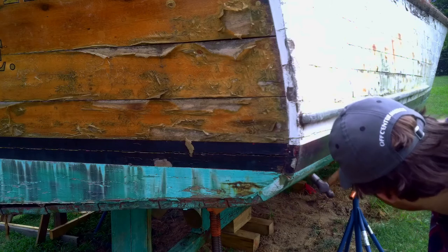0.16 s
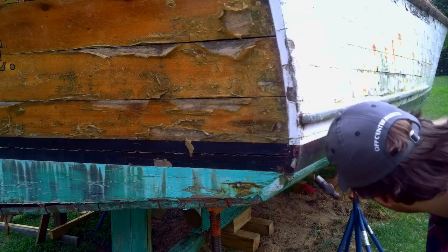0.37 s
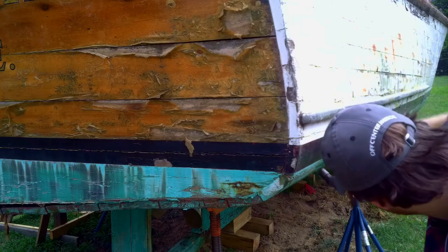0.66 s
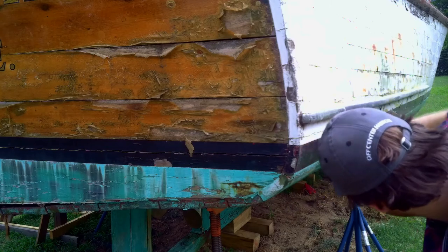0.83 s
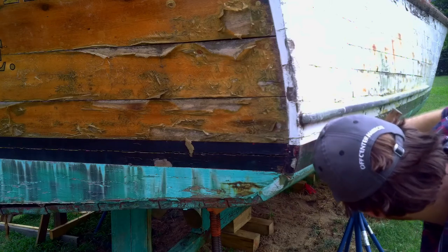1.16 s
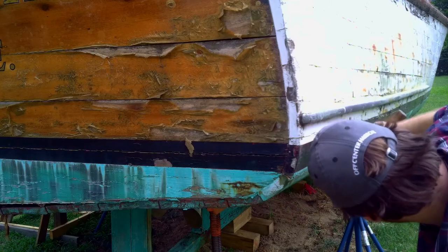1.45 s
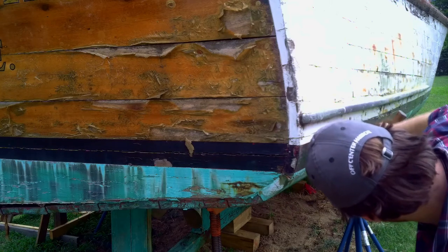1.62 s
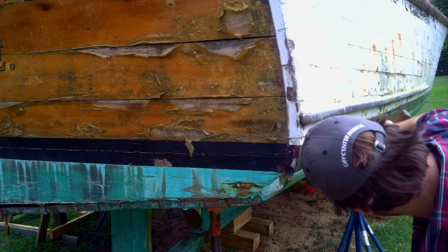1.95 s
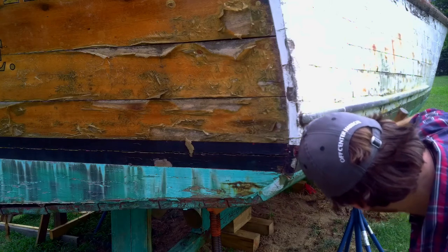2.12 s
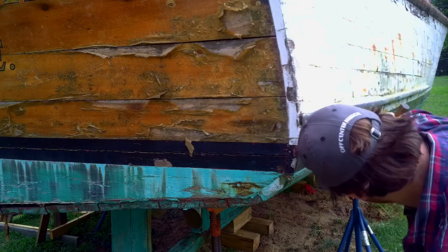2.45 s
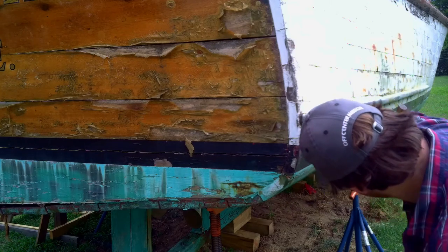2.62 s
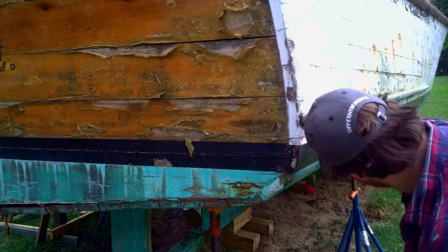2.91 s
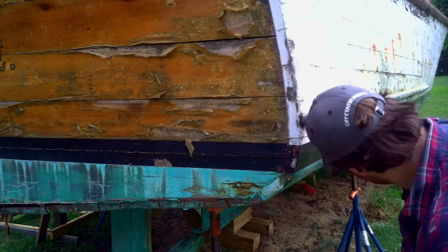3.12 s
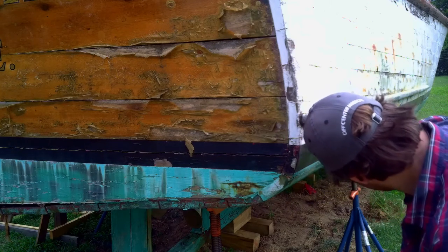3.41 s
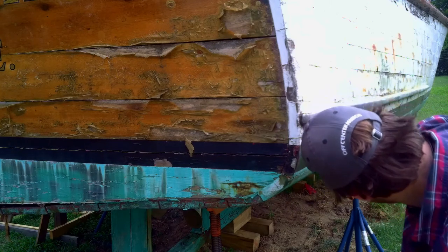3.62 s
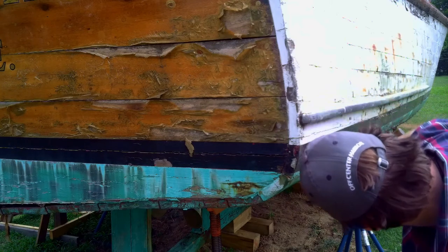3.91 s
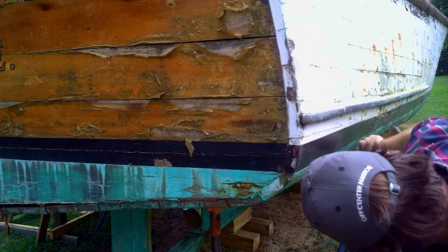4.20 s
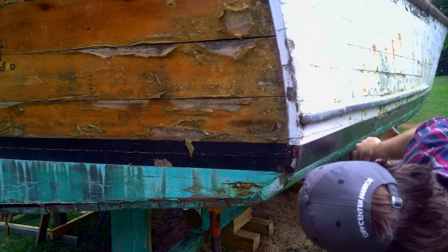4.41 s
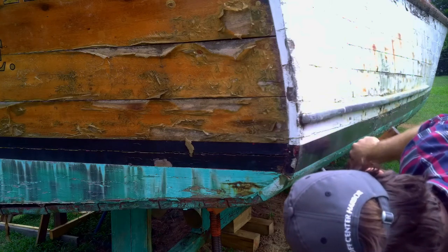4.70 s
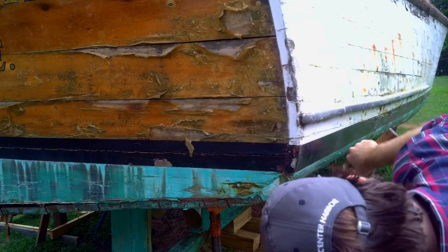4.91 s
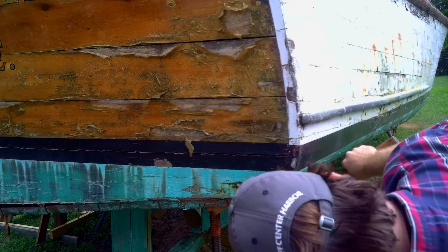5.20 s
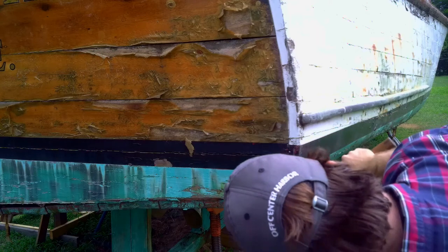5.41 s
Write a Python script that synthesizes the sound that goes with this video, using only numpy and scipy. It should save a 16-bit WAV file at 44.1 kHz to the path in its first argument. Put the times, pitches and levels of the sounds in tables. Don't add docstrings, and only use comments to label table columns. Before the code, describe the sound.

Outdoors beneath a propped wooden boat, a small hammer taps its planks about four times a second. Each dry, hollow knock has a short ring and small crack, with quick echoes from ground and props. The pitch shifts between planks, dropping boomier midway, softening later, then ending firm but duller. Faint high insects throb behind, with distant whistles and low traffic. One close microphone, heard in the left channel only.

```python
import sys
import numpy as np
from scipy import signal
from scipy.fft import rfft
from scipy.io import wavfile
from scipy.ndimage import uniform_filter1d

SR = 44100
rng = np.random.default_rng(int(sys.argv[2]) if len(sys.argv) > 2 else 0)


def makeup_ratio(level_db):
    decades = np.asarray(level_db, float) / 20
    return 10 ** decades


def persist_wave(psi):
    counts = np.round(np.clip(psi, -1, 1) * 32767).astype(np.int16)
    wavfile.write(sys.argv[1], SR, np.atleast_2d(counts).T)


N = 245284

# f/Hz, level/dB per Hz
AIR_SPECTRUM = [(12, -58), (20, -14.5), (48, -14), (102, -8.5), (224, -2), (289, -8), (583, -15.5),
                (1080, -21.5), (1690, -29), (4050, -31.5), (6710, -35.5), (7950, -41), (9150, -37.5),
                (15200, -38), (16500, -59)]
# t/s, knock level/dB, boom f/Hz, edge mode level/dB, crack level/dB
TAPS = [(0.0912, -5.5, 268.0, -7, -27), (0.3574, -6, 271, -12.5, -36.5), (0.6085, -9.0, 270, -17.5, -37.5),
        (0.86, -10, 280, -19, -32), (1.1125, -11.5, 271, -25, -32.5), (1.3658, -9.5, 260.6, -24.5, -33),
        (1.6003, -8.9, 245, -16.7, -33), (1.8542, -11.5, 239.6, -20.5, -33.5), (2.1159, -8, 248, -11, -31),
        (2.377, -8, 249.8, -14, -30), (2.6242, -11.4, 257, -12, -33), (2.9168, -14, 255, -14.5, -35),
        (3.1527, -7.7, 256, -11, -26), (3.41, -8.0, 254.5, -3.1, -28), (3.6755, -10, 246, -5, -28.5),
        (3.9281, -15.5, 239.4, -10.5, -35.5), (4.168, -16, 235.1, -10.7, -34),
        (4.3755, -15.5, 243, -18, -32), (4.629, -17.5, 255, -36, -41), (4.8805, -14, 281, -23, -36.5),
        (5.1164, -7.5, 263, -8, -29.5), (5.3583, -7.5, 259, -4.5, -26.5)]
# t/s, level below its tap/dB
LATE_ECHOES = [(0.143, -17), (0.398, -10.5), (.648, -10), (1.647, -15), (1.896, -10), (2.665, -25),
               (2.959, -21.5), (3.19, -21.5), (3.447, -24), (3.712, -21), (5.385, -23)]
# from t/s, knock f/Hz, ring f/Hz, edge f/Hz, ground echo delay/ms
PLANKS = [
    (0, 469, 690, 860.0, 5.51),
    (0.75, 510, 712, 1057.0, 5.5),
    (1.25, 486, 630, 964.0, 5.3),
    (2, 489, 660, 952.0, 5.02),
    (2.5, 371, 535, 854, 4.94),
    (3.05, 420, 575, 906, 4.0),
    (3.8, 428, 600, 915, 4.0),
    (4.28, 488, 683, 959.0, 5.2),
    (5, 428.0, 574.0, 795, 5.6),
]
# boom and ring level re knock/dB, ground echo/dB, frame echo/dB, frame delay/ms
PLANK_ANSWERS = [(-5, -7, -2.5, -10, 13.1), (0.3, -3, -0.4, -2, 10.23), (-0.6, -8, -3, -8.8, 12.9),
                 (0.9, -6.0, -6, -12, 13.9), (5.5, 1.1, -1.5, -8, 14.5), (2.5, 1.3, -9, -12, 13.9),
                 (1.4, -0.7, -4, -9, 11.2), (1.1, -3, -3.5, -3.5, 10.0), (-7.5, -16, -0.8, -13, 16.4)]
FASTENINGS_DB = [-15.5, -15.5, -16.5, -18, -9, -17.5, -13, -15.5, -12.5]
# f/Hz, width/Hz, level/dB
CRACK_MODES = [(1060, 160, 7.5), (1560, 482, 4), (2120, 830, -2), (3480, 910, -5.5), (4660, 1950, -13.5)]
# f/Hz, t60/s
HULL_DECAY = [(120, 0.27), (320, 0.25), (840, 0.15), (2200, 0.23), (5800, 0.038)]
# delay/ms, dull knock level/dB, crack level/dB
FAR_RETURNS = [(12.206, -8.5, -13), (22.85, -9.5, -25), (42.07, -18, -30), (59.0, -21, -38),
               (103.0, -27, -42)]
# t/s, level/dB
FLAKES = [
    (0.674, -51.5),
    (1.298, -66.5),
]
# t/s, level/dB
CHIPS = [
    (.443, -60),
    (2.504, -63),
    (4.612, -67),
]
# t/s, length/s, first f/Hz, last f/Hz, level/dB
WHISTLES = [
    (0.557, 0.27, 3536, 3051, -64),
    (1.309, .24, 3566, 3190, -65),
    (1.53, 0.28, 3560, 3180, -70),
    (2.749, .28, 3360, 3050, -64.5),
    (4.47, .25, 3367, 3067, -65),
]
# delay/s, level/dB
TREE_ECHOES = [(.016, -7.5), (.06, -13), (.1, -12), (.14, -12), (.19, -14)]

AIR_DB = -57
CHORUS_DB, UNEVEN_DB = -73, 0.8
THROB_HZ, THROB_PEAK_S, THROB_DB, THROB_LEAN = 3.98, 0.17, 2.5, 0.18
SIGNS, T60_S = (1, -1, -1, 1), (0.067, 0.033, 0.022, 0.019)
CONTACT_HZ, RADIATION_HZ = 1120, 151.7
CRACK_T60_S, CRACK_DB = 0.017, 10.5
SLAP_MS, SLAP_SPREAD_MS, SLAP_DB = 5.4, 0.4, 1.2
TAIL_DB, FAR_SIDE_HZ = -11, 416
WHISTLE_BEND, WHISTLE_SWELL_DB, WHISTLE_EDGE_S = 1.3, 3, 0.0085
CHIP_S, CHIP_LOW_HZ, CHIP_TOP_HZ, CHIP_RISE_S = 0.017, 5900, 7550, 0.0032
CONVERTER_HZ, MIRROR_DB, CUTOFF_HZ = 16000, -6, 16050
BLOCK, BLOCK_START, BLOCK_LEAD = 1024, 930, 400


def rms_one(x):
    return x / np.sqrt(np.mean(x ** 2) + 1e-20)


def at_hz(points, hz):
    points_hz, values = np.array(points)[:, 0], np.array(points)[:, 1]
    return np.interp(np.log(hz), np.log(points_hz), values)


def drift(rate_hz):
    r = np.exp(-80 * np.pi * rate_hz / SR)
    white = rng.standard_normal(N // 40 + 2002)
    slow = signal.lfilter([1], [1, -2 * r, r * r], white)[2000:]
    return np.interp(np.arange(N) / 40, np.arange(len(slow)), rms_one(slow))


def band(x, low_hz, high_hz):
    return signal.sosfilt(signal.butter(2, [low_hz, high_hz], "band", fs=SR, output="sos"), x)


def one_pole(x, hz):
    r = np.exp(-2 * np.pi * hz / SR)
    return signal.lfilter([1 - r], [1, -r], x)


def resonate(x, hz, width_hz):
    r = np.exp(-np.pi * width_hz / SR)
    zeros = np.array([1, 0, -1]) * (1 - r * r) / 2
    poles = [1, -2 * r * np.cos(2 * np.pi * hz / SR), r * r]
    return signal.lfilter(zeros, poles, x)


def add(track, sound, s):
    at = round(s * SR)
    track[at:at + len(sound)] += sound[:len(track) - at]


def air(patchy_db):
    edges_hz = 16 * 2 ** np.arange(0, 10.1, .5)
    white, together = rng.standard_normal((2, N)), drift(1.5)
    out = 0
    for k, (low, high) in enumerate(zip(edges_hz, edges_hz[1:])):
        flicker_db = patchy_db * (1.5 * together + drift(9.3))
        gain = makeup_ratio(at_hz(AIR_SPECTRUM, np.sqrt(low * high)) + flicker_db)
        out = out + gain * band(white[k % 2], low, high)
    return makeup_ratio(AIR_DB + 7) * rms_one(out)


def insects(hz, width_hz, pulse_hz, depth):
    turn = 2 * np.pi * THROB_HZ * (np.arange(N) / SR - THROB_PEAK_S)
    throb_db = THROB_DB * (np.cos(turn) - THROB_LEAN * np.sin(2 * turn))
    db = CHORUS_DB + throb_db + UNEVEN_DB * drift(11.0)
    stroke_hz = pulse_hz * (1 + 0.018 * drift(3.7))
    strokes = 1 + depth * np.sin(2 * np.pi * np.cumsum(stroke_hz) / SR)
    rasp = resonate(rng.standard_normal(N), hz, width_hz)
    rasp = resonate(rasp, hz, width_hz)
    return makeup_ratio(db + 5.5) * rms_one(rasp * strokes)


def mode(age, hz, db, t60_s):
    return makeup_ratio(db - 60 * age / t60_s) * np.sin(2 * np.pi * hz * age)


def plank(modes_hz, modes_db, ground_ms, ground_db, frame_ms, frame_db, shoulder_db):
    age = np.arange(SR // 8) / SR
    direct = sum(sign * mode(age, hz, db, t60_s)
                 for sign, hz, db, t60_s in zip(SIGNS, modes_hz, modes_db, T60_S))
    direct = direct + mode(age, 174.7, modes_db[1] - 24, 0.09)
    direct = direct - mode(age, 1146, max(modes_db) + shoulder_db, 0.015)
    direct = one_pole(one_pole(direct, CONTACT_HZ), CONTACT_HZ)
    for _ in range(2):
        direct = direct - one_pole(direct, RADIATION_HZ)
    heard = direct.copy()
    add(heard, makeup_ratio(ground_db) * direct, ground_ms / 1000)
    add(heard, makeup_ratio(frame_db) * direct, frame_ms / 1000)
    return heard


def crack(noise, db):
    burst = noise * makeup_ratio(db + CRACK_DB - 60 * np.arange(len(noise)) / SR / CRACK_T60_S)
    return sum((-1) ** k * makeup_ratio(level_db) * resonate(burst, hz, width_hz)
               for k, (hz, width_hz, level_db) in enumerate(CRACK_MODES))


def under_hull():
    age = np.arange(SR // 2) / SR
    edges_hz = 90 * 2 ** np.arange(0, 6.6, .5)
    white = rng.standard_normal((2, len(age)))
    dying = 0
    for k, (low, high) in enumerate(zip(edges_hz, edges_hz[1:])):
        t60_s = at_hz(HULL_DECAY, np.sqrt(low * high))
        dying = dying + band(white[k % 2], low, high) * makeup_ratio(-60 * age / t60_s)
    dying = dying * np.clip((age - .005) / 0.013, 0, 1)
    return dying / np.sqrt(np.mean(np.abs(rfft(dying)[50:1500]) ** 2))


def hammer():
    out = np.zeros(N)
    noise = rng.standard_normal((len(TAPS), 2, 1200))
    noise = signal.sosfilt(signal.butter(4, 5600, fs=SR, output="sos"), noise)
    spaces = [under_hull() for _ in PLANKS]
    for (s, db, boom_hz, edge_db, crack_db), (tick, slap) in zip(TAPS, noise):
        which = sum(s > row[0] for row in PLANKS) - 1
        _, *upper_hz, ground_ms = PLANKS[which]
        boom_db, ring_db, ground_db, frame_db, frame_ms = PLANK_ANSWERS[which]
        modes_db = (db + boom_db, db, db + ring_db, edge_db)
        body = plank((boom_hz, *upper_hz), modes_db, ground_ms, ground_db, frame_ms, frame_db,
                     FASTENINGS_DB[which])
        tap = body.copy()
        add(tap, crack(tick, crack_db), 0)
        slap_ms = SLAP_MS + SLAP_SPREAD_MS * rng.uniform(-1, 1)
        add(tap, crack(slap, crack_db + SLAP_DB), slap_ms / 1000)
        bright = tap - body
        add(out, tap, s)
        dull = one_pole(one_pole(body, FAR_SIDE_HZ), FAR_SIDE_HZ)
        for lag_ms, dull_db, bright_db in FAR_RETURNS:
            add(out, makeup_ratio(dull_db) * dull + makeup_ratio(bright_db) * bright, s + lag_ms / 1000)
        first_ms = makeup_ratio(-800 * np.arange(len(tap)) / SR)
        add(out, makeup_ratio(TAIL_DB) * signal.fftconvolve(tap * first_ms, spaces[which]), s)
        for again, below_db in LATE_ECHOES:
            if 0 < again - s < .1:
                add(out, makeup_ratio(below_db) * (body + 0.52 * bright), again)
    for (s, db), tick in zip(FLAKES, noise[:, 0]):
        add(out, crack(tick, db), s)
    return signal.sosfilt(signal.butter(2, 90, "high", fs=SR, output="sos"), out)


def note(hz, db, edge_s):
    age = np.arange(len(hz)) / SR
    pitch_hz = hz * (1 + 0.00694 * drift(68)[:len(hz)])
    ends = np.clip(np.minimum(age, age[-1] - age) / edge_s, 0, 1)
    return ends * makeup_ratio(db) * np.sqrt(2) * np.sin(2 * np.pi * np.cumsum(pitch_hz) / SR)


def birds(flutter_db):
    whistled = np.zeros(N)
    for s, length_s, first_hz, last_hz, db in WHISTLES:
        done = np.linspace(0, 1, round(length_s * SR))
        hz = first_hz + (last_hz - first_hz) * done ** WHISTLE_BEND
        add(whistled, note(hz, db + WHISTLE_SWELL_DB * (done - 1), WHISTLE_EDGE_S), s)
    heard = whistled * makeup_ratio(flutter_db * drift(20.5))
    for lag_s, db in TREE_ECHOES:
        add(heard, makeup_ratio(db) * whistled * makeup_ratio(flutter_db * drift(40)), lag_s)
    age = np.arange(round(CHIP_S * SR)) / SR
    chip_hz = CHIP_TOP_HZ - (CHIP_TOP_HZ - CHIP_LOW_HZ) * np.exp(-age / CHIP_RISE_S)
    for s, db in CHIPS:
        chip = note(chip_hz, db, .003)
        add(heard, chip, s)
        add(heard, makeup_ratio(-2) * chip, s + .013)
    return heard


def hush_top(x, above_hz, loss_db, hold_s):
    keep = np.ones(N)
    for s, *_ in TAPS:
        start = (round(s * SR) - BLOCK_LEAD - BLOCK_START) // BLOCK * BLOCK + BLOCK_START
        keep[start:round((s + hold_s) * SR)] = makeup_ratio(loss_db)
    top = signal.sosfiltfilt(signal.butter(8, above_hz, "high", fs=SR, output="sos"), x)
    return x - top * (1 - uniform_filter1d(keep, size=128))


def scene():
    sound = air(patchy_db=.6)
    sound = sound + insects(hz=7845, width_hz=830, pulse_hz=44.6, depth=0.28)
    sound = sound + hammer() + birds(flutter_db=3.2)
    return np.array([sound, np.zeros(N)])


def low_pass(x):
    return signal.sosfilt(signal.butter(12, 16980, fs=SR, output="sos"), x)


def record(dry):
    slope = np.diff(one_pole(dry, 2500), prepend=0) * SR / (2 * np.pi * CONVERTER_HZ)
    mirror = 2 * slope * np.cos(2 * np.pi * CONVERTER_HZ * np.arange(N) / SR)
    mirror = signal.sosfilt(signal.cheby2(8, 50, [9000, 16100], "band", fs=SR, output="sos"), mirror)
    heard = hush_top(dry, above_hz=8900, loss_db=-32, hold_s=0.004)
    heard = heard + makeup_ratio(MIRROR_DB) * mirror
    mix = signal.sosfilt(signal.cheby2(14, 45, CUTOFF_HZ, fs=SR, output="sos"), heard)
    return low_pass(mix)


dry = scene()
out = record(dry)
persist_wave(out)
```